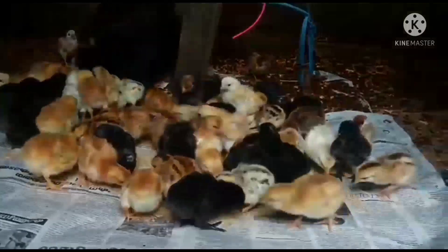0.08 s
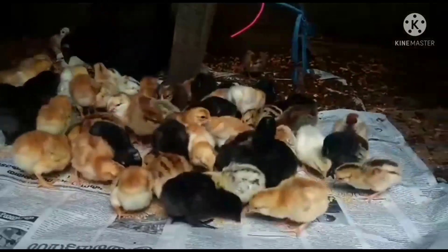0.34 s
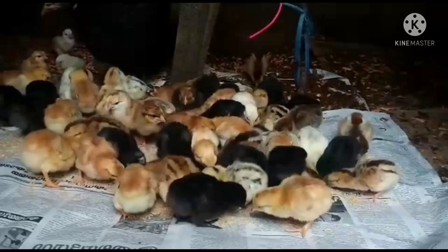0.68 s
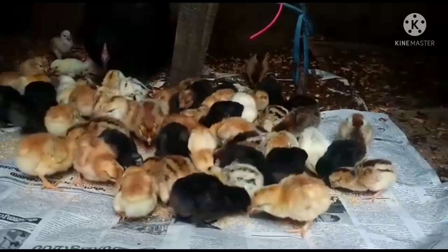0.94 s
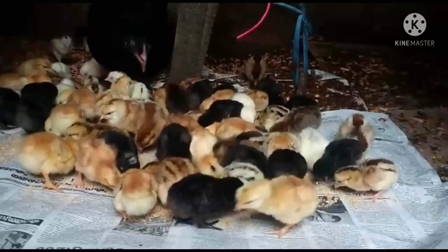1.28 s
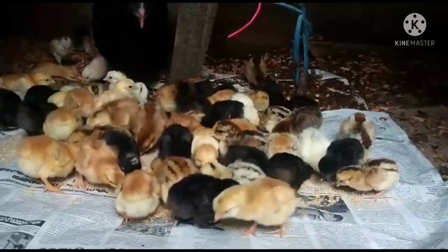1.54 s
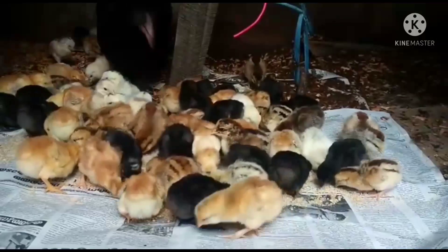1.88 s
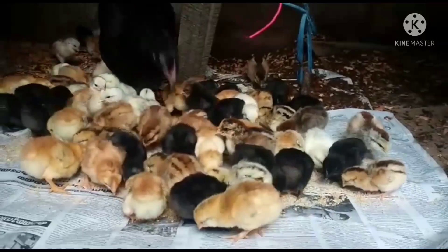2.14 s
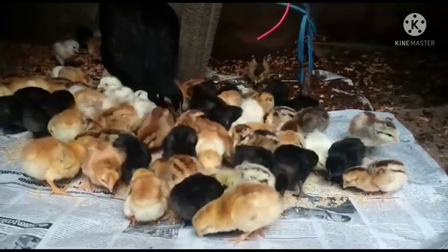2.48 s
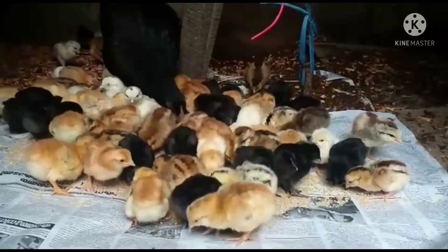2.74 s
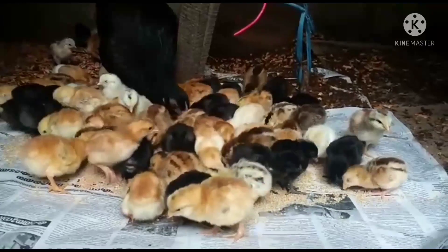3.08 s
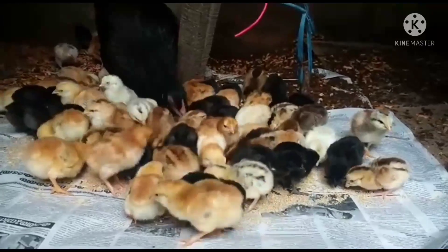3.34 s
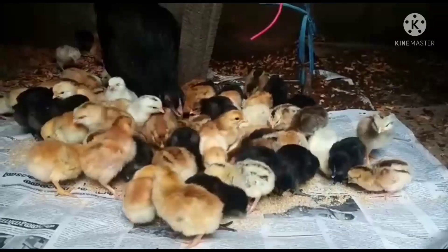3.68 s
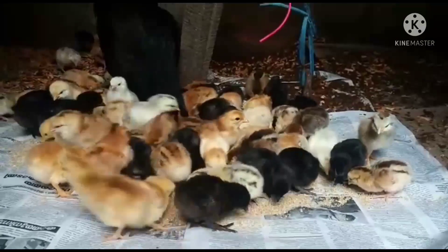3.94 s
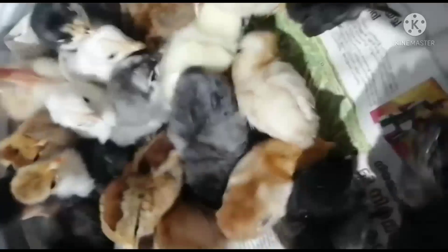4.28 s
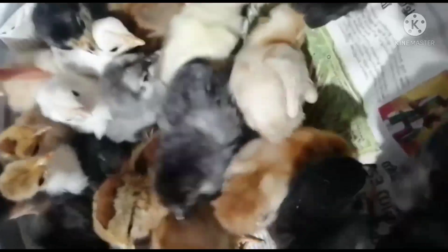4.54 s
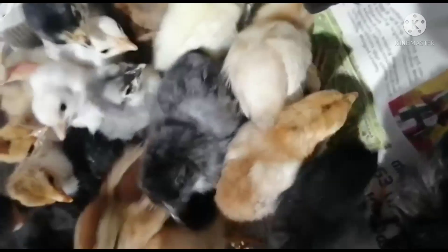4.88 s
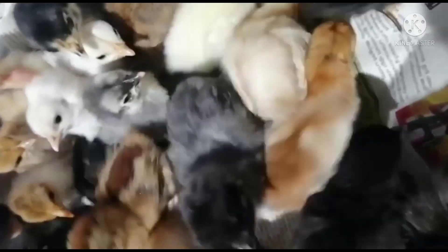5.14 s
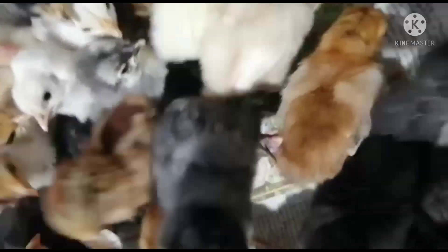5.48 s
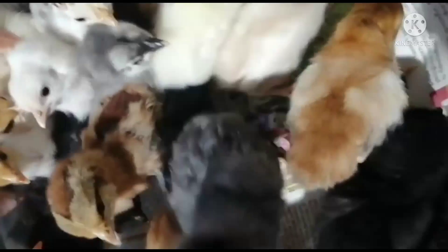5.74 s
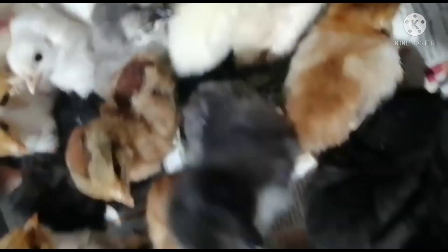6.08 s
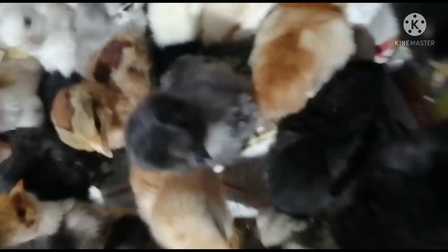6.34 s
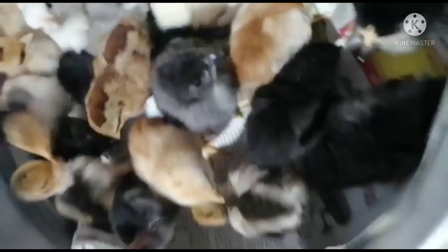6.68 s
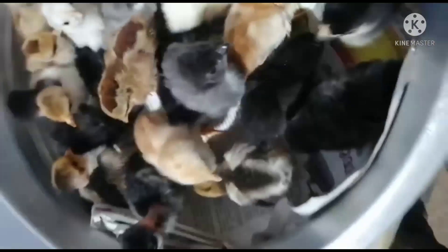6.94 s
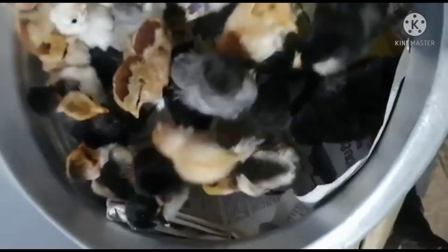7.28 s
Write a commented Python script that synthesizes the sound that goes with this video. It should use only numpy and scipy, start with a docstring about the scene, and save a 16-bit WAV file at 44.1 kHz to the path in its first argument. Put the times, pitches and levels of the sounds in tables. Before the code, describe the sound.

From the start, many chicks peep together on a shed floor, about a metre from the microphone. Quick rising twitters, short falling peeps and longer level whistles overlap, loudest around 2 seconds. Beneath them small feet shuffle and rustle on newspaper, with scattered dull pecks. At about 4.1 seconds everything drops to silence.

At 4.5 seconds the sound cuts in close to a metal tub. One chick gives seven loud, arching peeps, roughly every 0.4 seconds, each breaking to a lower, reedy tail; they grow louder and continue to about 7.3 seconds. A second chick answers from the left with four steep, falling cries between 4.7 and 6 seconds. Down brushes softly against the wall, with a few light taps and a tiny trill. A distant hen drawls very faintly from 5.6 to 6.6 seconds. A soft low bump comes near 6.4 seconds, followed by a few brief, hoarse squeaks.

```python
"""Chicks in a shed, then in a metal tub

A metre or so from a two-port microphone, a flock feeds on newspaper on a shed floor: rising twitters,
level whistles, peeps, pecks and scuffling feet. After a short silence two chicks cry close by in a metal
tub, one in arches that break to a low tail, the other in steep falls; down brushes the wall and a hen
drawls far off. Each chick call is a nearly pure syrinx tone, reaching each port with its own echoes."""
import sys
import numpy as np
from scipy import signal
from scipy.fft import rfft, irfft, next_fast_len
from scipy.io import wavfile
from scipy.ndimage import map_coordinates

SR = 44100
rng = np.random.default_rng(int(sys.argv[2]) if len(sys.argv) > 2 else 0)


def materialize(psi):
    """Save the field psi as 16-bit PCM at rate SR to the path in sys.argv[1].

    A 1-D psi becomes a single channel; in a 2-D psi each row is a channel.
    """
    bounded = np.clip(np.atleast_2d(psi).T, -1, 1)
    quanta = np.round(bounded * 32767).astype(np.int16)
    wavfile.write(sys.argv[1], SR, quanta)


N = 322812
FLOCK_END_S, TUB_START_S, TOP_HZ = 4.145, 4.551, 15600

# feet on the newspaper: t/s, relative shuffle level/dB, relative rustle level/dB
FOOT_ACTIVITY = [(0.0, -51, -60), (0.67, -50.5, -56.5), (0.88, -54.5, -63), (1.32, -55, -58.5),
                 (1.94, -52, -58.5), (2.37, -53, -56.5), (2.96, -52, -55.5), (3.48, -56.5, -58),
                 (3.79, -50, -58), (3.9, -57.5, -59)]
# spectra of low shuffle, fine rustle, shed air, tub air and down on metal: f/Hz, relative density/dB
SHUFFLE_SPECTRUM = [(25, -11.5), (70, -1.5), (130, 5.5), (200, -2), (450, -3), (900, -7.5), (1800, -4),
                    (3000, -4), (6000, -21.5)]
RUSTLE_SPECTRUM = [(500, -6.5), (2000, 4.5), (4000, 6.5), (7000, 1), (9000, -5.5), (12000, -5),
                   (15500, -16.5)]
SHED_AIR = [(15, -37), (25, -2), (113, -16.5), (368, -15), (567, -21.5), (970, -19), (2700, -21.5),
            (3630, -17.5), (4040, -21.5), (5430, -27), (7910, -17.5), (9300, -34.5), (12200, -41.5),
            (14300, -27.5), (15500, -26)]
TUB_AIR = [(15, -36.5), (25, -20), (107, -2.5), (169, -16), (399, -11.5), (598, -14.5), (919, -19),
           (1850, -12), (4260, -14), (5580, -13.5), (8580, -24.5), (9550, -26.5), (15500, -39.5)]
BRUSH_SPECTRUM = [(60, 0.5), (300, -14.5), (600, -8), (850, 3.5), (1200, -0.5), (1750, -5), (3000, -18),
                  (9000, -27)]
# downward slides and short peeps: t/s, length/s, nominal f/Hz, level/dB, left-right/dB
SLIDE_NOTES = [(0, 0.047, 1920, -49.5, -3), (.14, 0.087, 3300, -37, 4), (.32, 0.046, 3560, -32, 1),
               (.34, 0.031, 2490, -36, -5), (.482, 0.066, 3460, -27, -5), (.545, 0.031, 2750, -30.5, -11),
               (.655, 0.061, 3445, -34.5, 1), (.82, 0.13, 1880, -53, 0), (.905, 0.022, 2680, -45, 0),
               (1.06, 0.03, 3020, -33, -13), (1.1, 0.056, 1980, -58, -7), (1.155, 0.05, 1710, -53, -9),
               (1.22, 0.04, 2870, -50, -7), (1.435, 0.091, 1490, -44.5, -8), (2.44, 0.11, 2820, -46, 4),
               (2.65, 0.052, 2893, -40, 0), (3.32, 0.068, 2300, -46, 3), (3.44, 0.048, 2950, -51.5, 2),
               (3.785, 0.049, 3290, -46, -2), (3.82, 0.085, 1382, -38.5, -4.5),
               (3.998, 0.023, 3240, -38, -2), (3.985, 0.1, 1470, -43, -1), (4.78, 0.17, 2905, -60.5, -2),
               (5.668, 0.09, 3428, -47.5, 14), (5.78, 0.05, 2950, -41.5, -3),
               (6.745, 0.022, 3220, -43.5, 3), (6.978, 0.12, 2745, -47, 5), (7.06, 0.062, 1805, -50, 9)]
PEEP_NOTES = [(.88, 0.05, 3214, -33, 23), (1.295, 0.024, 2260, -36, -6), (1.2, 0.055, 3570, -30.5, -2),
              (1.64, 0.047, 1955, -36, -16), (1.95, 0.042, 3680, -22.5, 11), (2.647, .06, 2470, -40, -2),
              (2.775, .04, 4580, -34.5, -8), (3.825, 0.07, 2937, -38.5, -10), (3.93, 0.1, 3690, -33, -1),
              (3.94, 0.12, 1783, -42, -8)]
# upward feeding notes: t/s, length/s, start f/Hz, end f/Hz, level/dB
FEEDING_NOTES = [(0.019, 0.054, 2390, 3870, -39), (.085, 0.027, 3200, 4360, -41.5),
                 (0.199, 0.019, 3037, 5270, -36.5), (0.204, 0.023, 3690, 4480, -44),
                 (0.347, 0.034, 3400, 4720, -39), (0.415, 0.035, 3480, 4860, -39),
                 (0.461, 0.029, 3750, 4680, -39.5), (.61, 0.023, 3080, 4050, -40.5),
                 (0.826, 0.047, 3580, 4700, -37.5), (0.864, 0.023, 2600, 4840, -34),
                 (1.004, 0.021, 3190, 4710, -37), (1.11, .065, 4100, 4900, -38),
                 (1.146, 0.034, 2340, 4400, -42), (1.252, 0.05, 3500, 4980, -39.5),
                 (1.299, 0.045, 3110, 4770, -37), (1.465, 0.052, 3570, 5100, -36),
                 (1.628, 0.028, 3420, 4330, -49), (1.693, .025, 3680, 4700, -43.5),
                 (1.72, 0.026, 3380, 4660, -42.5), (1.776, 0.049, 2200, 3150, -49),
                 (1.797, .033, 3400, 4870, -40.5), (1.919, 0.055, 3700, 4900, -37),
                 (2.032, 0.02, 3750, 4600, -37.5), (2.147, 0.024, 3380, 5270, -36),
                 (2.166, 0.046, 3300, 4670, -29), (2.203, 0.025, 3480, 5300, -41.5),
                 (2.33, 0.02, 3700, 4800, -47.5), (2.406, 0.042, 3300, 4650, -35),
                 (2.559, 0.045, 3560, 4890, -36.5), (2.657, 0.03, 3450, 5000, -33),
                 (2.721, .04, 3370, 3970, -39), (2.767, 0.031, 3420, 4430, -38),
                 (2.818, 0.03, 2390, 4270, -37.5), (2.904, 0.047, 3456, 4500, -30.5),
                 (2.941, 0.048, 3680, 4840, -34), (3.107, 0.04, 3914, 4860, -29),
                 (3.162, 0.037, 3960, 4800, -37.5), (3.198, 0.028, 3290, 4130, -39),
                 (3.31, 0.018, 4170, 5050, -41), (3.364, .048, 3370, 4710, -35.5),
                 (3.381, 0.02, 3400, 3940, -40.5), (3.449, 0.025, 3500, 4600, -54.5),
                 (3.495, 0.036, 3000, 4740, -37), (3.511, 0.027, 3400, 5470, -50),
                 (3.663, 0.051, 3570, 4650, -40), (3.686, 0.03, 3360, 4510, -40.5),
                 (3.806, 0.04, 3260, 4360, -42), (3.839, 0.044, 3600, 4670, -32.5),
                 (3.882, 0.021, 3650, 4690, -32.5), (3.941, 0.042, 3620, 5150, -41.5),
                 (3.98, 0.026, 3900, 5070, -34), (4.08, 0.024, 2950, 3930, -43)]
# level whistles: t/s, length/s, crest f/Hz, level/dB, left-right/dB
WHISTLE_NOTES = [(0.083, 0.16, 1806, -41, -1.5), (0.218, 0.17, 2756, -37.5, -1),
                 (1.019, .23, 3102, -32, -12), (1.276, 0.17, 2370, -46, -7), (1.311, 0.22, 3183, -27, -10),
                 (1.36, 0.13, 2814, -48.5, 0), (1.588, 0.26, 3310, -27, 4.5), (1.89, 0.2, 3320, -27, 4),
                 (2.021, 0.061, 3604, -20.5, 8), (2.214, 0.18, 3582, -22, 1), (2.66, 0.17, 2845, -46, 0),
                 (2.865, 0.23, 2920, -42.5, 5), (3.063, .25, 1640, -45, -1), (3.422, 0.19, 1683, -44, -1.5),
                 (3.594, 0.14, 2602, -36, -6), (3.659, 0.2, 1736, -42, 2.5),
                 (4.085, 0.054, 4220, -36.5, -5)]
# pecks and footfalls, later taps in the tub: t/s, relative level/dB, resonance f/Hz, t60/s
PECKS_AND_STEPS = [(.18, -35.5, 433, 0.32), (0.45, -44, 390, 0.21), (0.774, -40, 790, 0.13),
                   (.901, -39.5, 248, 0.13), (1.683, -37, 500, 0.11), (2.001, -29.5, 1050, 0.14),
                   (2.247, -28, 236, .13), (2.479, -29, 447, 0.1), (2.48, -29.5, 1214, 0.13),
                   (2.649, -27, 2530, 0.025), (2.928, -37, 590, 0.23), (3.185, -37, 433, 0.24),
                   (3.605, -30, 1900, 0.22), (3.638, -30, 504, 0.13), (5.374, -22.5, 1350, 0.0093),
                   (5.678, -34.5, 1000, 0.023), (6.55, -40, 1004, 0.11), (6.575, -52, 367, 1)]
# hoarse protests: t/s, length/s, crest f/Hz, level/dB, left-right/dB
HOARSE_CRIES = [(.28, .06, 3830, -27, -4), (.428, .083, 3970, -26, 8), (6.652, .095, 4000, -40, 4),
                (7.055, .1, 4080, -39, 7)]
# first chick in the tub: t/s, climb/s, droop/s, crest f/Hz, break f/Hz, level/dB, left-right/dB,
# then its tail: length/s, f/Hz, relative level/dB, left-right/dB
ARCHED_CRIES = [(4.534, .043, 0.062, 4460, 3960, -27, 1.5, .055, 3210, -33, -2.5),
                (4.937, 0.049, 0.057, 4490, 3960, -25, 8, .06, 3350, -32, 8.5),
                (5.364, .056, 0.062, 4493, 3840, -27.5, 5, 0.067, 3170, -37, -1),
                (5.759, 0.054, 0.056, 4370, 3730, -25, -18, 0.055, 3176, -26, -20),
                (6.342, .035, 0.091, 4234, 3580, -22.5, -14, .043, 2900, -25, -0.5),
                (6.727, 0.044, 0.062, 4540, 4103, -22, 6, .058, 3400, -23, 14),
                (7.115, .05, 0.049, 4556, 4220, -21, 3, 0.078, 3350, -24.5, -16)]
# second chick: t/s, length/s, held f/Hz, nominal break f/Hz, level/dB, relative tail/dB, left-right/dB
FALLING_CRIES = [(4.685, .057, 4830, 4320, -30.5, -39.5, 18), (5.042, 0.06, 4914, 4270, -29.5, -44.5, 35.5),
                 (5.46, 0.054, 5300, 4350, -28.5, -37.5, 28), (5.967, .049, 5315, 4560, -29, -31, 18)]
# bodies against the tub wall: mid-stroke t/s, relative level/dB
BRUSH_STROKES = [(4.95, -67.5), (5.311, -63.5), (5.7, -59.5), (5.86, -63.5), (6.32, -58.5), (6.589, -57.5),
                 (6.72, -66)]
# soft purling: t/s, length/s, centre f/Hz, swing/Hz, swing rate/Hz, level/dB
TRILL_NOTES = [(5.261, 0.078, 3564, 917, 32, -41.5)]
# the far hen's drawl: t/s, f/Hz, level/dB
HEN_DRAWL = [(5.62, 356, -81), (5.78, 353, -61.5), (6, 348.5, -69.5), (6.2, 336.6, -66),
             (6.35, 330.4, -56.5), (6.5, 321, -66), (6.6, 315, -74)]
# colour of a chick's throat, the hen's throat and the reflections: f/Hz, gain/dB
CHICK_THROAT = [(1200, -6.5), (3000, 9), (5500, 4.5), (6700, -6.5), (7500, -2.5), (9000, -8), (11000, -14),
                (13300, -11), (15500, -18.5)]
HEN_FORMANTS = [(340, -38), (680, 6.5), (1000, 4), (1350, -11), (1720, 6.5), (2050, -2), (2800, -33)]
REFLECTION_COLOUR = [(300, 2.5), (4400, 7.5), (7000, 10.5), (10000, 5), (15000, 8)]
# likeness of noise at the two ports: f/Hz, correlation
PORT_LIKENESS = [(100, 0.91), (300, 0.76), (600, 0.58), (1200, 0), (15000, 0)]
# balance of the ports over the tub: f/Hz, left-right/dB
TUB_BALANCE = [(2000, 4), (3000, -6), (4400, 3.5), (5500, -2.5), (7500, 6), (10000, 8.5), (13000, -0.5)]


def amp(db):
    return 10 ** (np.asarray(db) / 20)


def unit(x):
    return x / np.sqrt(np.mean(x ** 2) + 1e-20)


def along(points, hz):
    """Read (frequency, value) points on a log axis."""
    f, values = np.transpose(points)
    return np.interp(np.log(hz + 1), np.log(f), values)


def curves(rows):
    """One value per sample for each column after the time."""
    s, *columns = np.transpose(rows)
    return [np.interp(np.arange(N) / SR, s, column) for column in columns]


def clock(length_s):
    return np.arange(max(int(length_s * SR), 64)) / SR


def wobble(rate, n):
    """A smooth random curve of n samples, rate knots a second."""
    return map_coordinates(rng.standard_normal(int(n * rate / SR) + 4), [np.arange(n) * rate / SR])


def filtered(x, response):
    """Shape x by a response given as a function of frequency."""
    n = x.shape[-1]
    padded = next_fast_len(n + 4096)
    return irfft(rfft(x, padded) * response(np.fft.rfftfreq(padded, 1 / SR)), padded)[..., :n]


def add(track, s, x):
    """Mix a stereo sound in at s seconds."""
    i = int(np.clip(round(s * SR), 0, N - 1))
    track[:, i:i + x.shape[1]] += x[:, :N - i]


def noise(spectrum):
    """Noise of rms 1, alike at both ports in the bass and unrelated in the treble."""
    def mid_side_gains(hz):
        angle = np.arccos(np.clip(along(PORT_LIKENESS, hz), -1, 1)) / 2
        return amp(along(spectrum, hz)) * [np.cos(angle), np.sin(angle)]
    mid, side = filtered(rng.standard_normal((2, N)), mid_side_gains)
    return unit(np.array([mid + side, mid - side]))


def place(x, pan_db, lead_s, early_db, early_t60, late_db, late_t60):
    """Direct sound, the left port ahead by lead_s, then reflections and a room tail new for each spot."""
    t = clock(.45)

    def echoes(t60):
        return unit(rng.standard_normal((2, len(t))) * amp(-60 * t / t60) * (t > .002)) / np.sqrt(len(t))
    room = amp(early_db) * echoes(early_t60) + amp(late_db) * echoes(late_t60)
    response = filtered(room, lambda hz: amp(along(REFLECTION_COLOUR, hz)))
    delay = np.clip(np.round([-lead_s * SR, lead_s * SR]), 0, len(t) - 1).astype(int)
    response[[0, 1], delay] += unit(amp([pan_db / 2, -pan_db / 2]))
    return signal.fftconvolve(x[None], response, axes=1)


def in_shed(x, pan_db, lead_s, wet_db=0):
    """On the shed floor, a metre or so from the microphone."""
    return place(x, pan_db, lead_s, early_db=wet_db - 10.5, early_t60=.087,
                 late_db=wet_db - 16, late_t60=.15)


def in_tub(x, pan_db):
    """Down among the metal walls."""
    return place(x, pan_db, lead_s=.0003, early_db=-2.5, early_t60=.17, late_db=-12, late_t60=.42)


def on_mic(x, pan_db):
    """From a raised beak aimed at the ports: mostly direct sound."""
    return place(x, pan_db, lead_s=.0003, early_db=-16.5, early_t60=.08, late_db=-21, late_t60=.42)


def among_chicks(s, x, db, pan_db):
    """Places a call in the shed or the tub, by its time."""
    if s < FLOCK_END_S:
        faintness_db = np.clip(-20.5 - db, -5, 10)
        return in_shed(amp(db) * x, pan_db, lead_s=.0004, wet_db=.01 * faintness_db)
    return in_tub(amp(db) * x, pan_db)


def glide(t, start, middle, end):
    """A parabolic pitch path through three points."""
    return np.polyval(np.polyfit([0, .5, 1], [start, middle, end], 2), t / t[-1])


def arch(t, crest_s, start, end, flatness):
    """A pitch path as a share of its crest: up from the start, a flat top, down to the end."""
    u = (t - crest_s) / np.where(t < crest_s, crest_s, t[-1] - crest_s)
    return 1 - (1 - np.where(u < 0, start, end)) * np.abs(u) ** flatness


def swell(t, rise, fall):
    """Air pressure over a note: smooth rise and fall, as shares of its length."""
    u = t / t[-1]
    return np.sin(np.pi / 2 * np.minimum(u / rise, 1)) * np.sin(np.pi / 2 * np.minimum((1 - u) / fall, 1))


def syrinx(pitch, overtone_db, slope_db, jitter=.0027, flutter_db=3.5):
    """A chick's voice: a slightly unsteady tone with overtones coloured by the throat."""
    n = len(pitch)
    phase = 2 * np.pi * np.cumsum(pitch * (1 + jitter * wobble(221.6, n))) / SR
    tone = np.sin(phase)
    for k in range(2, 6):
        gain = amp(overtone_db + slope_db * (k - 2) + along(CHICK_THROAT, k * pitch))
        tone += gain * (k * pitch < TOP_HZ) * np.sin(k * phase)
    return np.sqrt(2) * tone * amp(flutter_db * wobble(74.8, n))


def scuffle(count=170):
    """Many small feet on newspaper: a low shuffle, a fine rustle and single ticks that grow busier."""
    shuffle_db, rustle_db = curves(FOOT_ACTIVITY)
    taps = np.zeros(N)
    tap_samples = (rng.random(count) ** .6 * FLOCK_END_S * SR).astype(int)
    np.add.at(taps, tap_samples, amp(4.5 * rng.exponential(size=count).clip(0, 2)))
    ticks = amp(-10) * unit(signal.lfilter([1], [1, -np.exp(-1 / (.0041 * SR))], taps))
    rustle = noise(RUSTLE_SPECTRUM) * amp(rustle_db + 7.5) * (amp(4 * wobble(25, N)) + ticks)
    shuffle = noise(SHUFFLE_SPECTRUM) * amp(shuffle_db + 2.5) * (amp(3.1 * wobble(18, N)) + ticks)
    return rustle + shuffle


def peeps(rows, start, end, jitter):
    """Short, rough calls falling from start to end (shares of nominal pitch); reedier in the tub."""
    out = np.zeros((2, N))
    for s, length, hz, db, pan_db in rows:
        t = clock(length)
        overtone_db = -25 if s < FLOCK_END_S else -9
        voice = syrinx(hz * glide(t, start, .94, end), overtone_db, -4, jitter, flutter_db=1.5)
        add(out, s, among_chicks(s, voice * swell(t, rise=.23, fall=.85), db, pan_db))
    return out


def huddle(count=280, rising_share=.62):
    """The chicks at the back of the shed: faint flicks and lower, falling chatter at random."""
    out = np.zeros((2, N))
    for i, (when, kind) in enumerate(rng.random((count, 2))):
        size, height, loudness, side = rng.standard_normal(4)
        db = -48 + 2.5 * min(loudness, 1.3) - 1.53 * abs(height)
        if kind < rising_share:
            t = clock(.035 * np.exp(.25 * size))
            pitch = glide(t, 3148, 3700, 4650) * np.exp(.12 * height)
        else:
            t = clock(.055 * np.exp(.25 * size))
            pitch = glide(t, 2800, 2700, 2276) * np.exp(.26 * min(height, 1.8))
            db -= 2.5
        note = syrinx(pitch, overtone_db=-29, slope_db=-16, jitter=.012) * swell(t, rise=.81, fall=.67)
        distant = place(amp(db) * note, pan_db=3 * side, lead_s=.00032 * side,
                        early_db=-2.5, early_t60=.13, late_db=-10.5, late_t60=.22)
        add(out, (i + when) / count * FLOCK_END_S, distant)
    return out


def twitters(dwell_s=.04, sag_hz_per_s=9000):
    """Contented upward flicks from all over the flock; a longer one dwells and sags before it rises."""
    out = np.zeros((2, N))
    for s, length, start_hz, end_hz, db in FEEDING_NOTES:
        t = clock(length)
        u = t / t[-1]
        climb = u ** (1 + (length / dwell_s) ** 2)
        pitch = start_hz + (end_hz - start_hz) * climb - sag_hz_per_s * t * (1 - u)
        voice = syrinx(pitch, overtone_db=-22.5, slope_db=0, jitter=.012, flutter_db=2.5)
        note = amp(db) * voice * swell(t, rise=.4, fall=.24)
        add(out, s, in_shed(note, rng.normal(0, 3.4), lead_s=rng.normal(.00029, .0001), wet_db=-.5))
    return out


def whistles():
    """Drawn-out, firm peeps that ease up to one pitch, hold it and swell in the middle."""
    out = np.zeros((2, N))
    for s, length, hz, db, pan_db in WHISTLE_NOTES:
        t = clock(length)
        pitch = hz * arch(t, .55 * length, start=.91, end=.93, flatness=3)
        voice = syrinx(pitch, overtone_db=-27, slope_db=-5, jitter=.006, flutter_db=1)
        add(out, s, among_chicks(s, voice * swell(t, rise=.44, fall=.39), db, pan_db))
    return out


def pecks_and_steps():
    """Pecks and steps on the shed's paper, later taps in the tub: dull knocks with a short crackle."""
    out, t = np.zeros((2, N)), clock(.3)
    for s, db, knock_hz, t60 in PECKS_AND_STEPS:
        def dull_resonance(hz):
            resonance = 1j * hz * knock_hz / (knock_hz ** 2 - hz ** 2 + .9j * hz * knock_hz)
            return resonance / (1 + 1j * hz / 3000)
        body = unit(filtered(rng.standard_normal(len(t)), dull_resonance)) * amp(-60 * t / t60)
        crackle = amp(-16) * rng.standard_normal(len(t)) * amp(-60 * t / .026)
        add(out, s, in_shed(amp(db - 4) * (body + crackle), pan_db=6.3, lead_s=.00019))
    return out


def hoarse_cries(rasp=.04):
    """Jostled chicks protest: a full, hoarse arch whose pitch shakes fast."""
    out = np.zeros((2, N))
    for s, length, hz, db, pan_db in HOARSE_CRIES:
        t = clock(length)
        pitch = hz * arch(t, .4 * length, start=.88, end=.92, flatness=2.5)
        pitch *= 1 + rasp * wobble(1100, len(t))
        note = syrinx(pitch, overtone_db=-25, slope_db=-3, flutter_db=3) * swell(t, rise=.2, fall=.15)
        add(out, s, among_chicks(s, note, db, pan_db))
    return out


def broken_tail(length_s, hz, overtone_db, slope_db, end, drop):
    """As pressure fails the voice drops to a lower, reedier register, holds briefly and bends away."""
    t = clock(length_s)
    pitch = hz * (glide(t, 1, (2 + end) / 3, end) + drop * np.exp(-t / .0025))
    voice = syrinx(pitch, overtone_db, slope_db, jitter=.003, flutter_db=1.5)
    return voice * swell(t, rise=.04, fall=.95) ** 1.25


def arched_cries():
    """A lost chick's loud, smooth peep, on mic: up to a crest, down to the break, then the tail."""
    out = np.zeros((2, N))
    for s, climb, droop, crest_hz, break_hz, db, pan_db, *tail_row in ARCHED_CRIES:
        tail_s, tail_hz, tail_db, tail_pan_db = tail_row
        t = clock(climb + droop)
        pitch = crest_hz * arch(t, climb, start=.83, end=break_hz / crest_hz, flatness=2.1)
        voice = syrinx(pitch, overtone_db=-15, slope_db=-6, jitter=.0015, flutter_db=-1.5)
        tail = broken_tail(tail_s, tail_hz, overtone_db=-6.5, slope_db=-5.5, end=.63, drop=.21)
        add(out, s, on_mic(amp(db) * voice * swell(t, rise=.44, fall=.04), pan_db))
        add(out, s + climb + droop - .002, on_mic(amp(tail_db - .5) * tail, tail_pan_db))
    return out


def falling_cries(onset_s=.011, onset_hz=6150, scoop_hz=450, sink_hz=200, settle_s=.005):
    """A second chick answers from the top of its range: thin onset, full sinking voice, reedy tail."""
    out = np.zeros((2, N))
    for s, length, held_hz, break_hz, db, tail_db, pan_db in FALLING_CRIES:
        onset_t, t = clock(onset_s), clock(length)
        onset_pitch = np.linspace(onset_hz, held_hz + scoop_hz, len(onset_t))
        onset = syrinx(onset_pitch, overtone_db=-9, slope_db=-10) * swell(onset_t, rise=.91, fall=.09)
        pitch = np.linspace(held_hz, break_hz, len(t))
        pitch += scoop_hz * np.exp(-t / settle_s)  # settles from above
        pitch -= sink_hz * np.exp((t - length) / settle_s)  # sinks just before the break
        voice = syrinx(pitch, overtone_db=-12.5, slope_db=-9, jitter=.0015, flutter_db=1.5)
        tail = broken_tail(length_s=.035, hz=3787, overtone_db=.5, slope_db=1.5, end=.68, drop=0)
        add(out, s - onset_s, in_tub(amp(db - 10.5) * onset, pan_db))
        add(out, s, in_tub(amp(db) * voice * swell(t, rise=.18, fall=.078), pan_db))
        add(out, s + length, in_tub(amp(tail_db - 2) * tail, pan_db))
    return out


def brushing(half_stroke_s=.066):
    """Down brushes the metal in strokes that swell and fade, with faint stirring between them."""
    t = np.arange(N) / SR
    strokes = sum(amp(db) * np.exp(-((t - s) / half_stroke_s) ** 2) for s, db in BRUSH_STROKES)
    catching = amp(2.5 * wobble(40, N))
    return amp(4.5) * (strokes + amp(-72)) * catching * noise(BRUSH_SPECTRUM)


def trill():
    """Another chick in the tub purls softly on mic, its pitch swinging fast."""
    out = np.zeros((2, N))
    for s, length, centre_hz, swing_hz, rate_hz, db in TRILL_NOTES:
        t = clock(length)
        pitch = centre_hz + swing_hz * np.cos(2 * np.pi * rate_hz * t)
        note = syrinx(pitch, overtone_db=-5, slope_db=-7) * swell(t, rise=.48, fall=.19)
        add(out, s, on_mic(amp(db) * note, pan_db=3.2))
    return out


def far_hen():
    """A hen outside, well off mic, draws out one faint, hoarse, sinking note."""
    pitch, db = curves(HEN_DRAWL)
    phase = 2 * np.pi * np.cumsum(pitch * (1 + .0128 * wobble(90, N))) / SR
    harmonics = (amp(along(HEN_FORMANTS, k * np.median(pitch))) * np.sin(k * phase) for k in range(1, 8))
    voice = amp(db) * unit(sum(harmonics))
    return place(voice, pan_db=0, lead_s=0, early_db=-12, early_t60=.06, late_db=-10, late_t60=.3)[:, :N]


def handling_bump(at_s=6.357, hz=36, db=-32, t60=.13):
    """One soft, low handling bump, the same at both ports."""
    out, t = np.zeros((2, N)), clock(.2)
    bump = amp(db) * np.sin(2 * np.pi * hz * t) * amp(-60 * t / t60)
    add(out, at_s, np.array([bump, bump]))
    return out


def squawk(at_s=6.844, length_s=.043, nominal_hz=5830, db=-32.5):
    """A jostled chick in the tub forces its voice into a rasping downward slide."""
    out, t = np.zeros((2, N)), clock(length_s)
    pitch = nominal_hz * glide(t, 1.22, .88, .85) * (1 + .035 * wobble(900, len(t)))
    note = syrinx(pitch, overtone_db=-20, slope_db=7, flutter_db=-1) * swell(t, rise=.18, fall=.23)
    add(out, at_s, in_tub(amp(db) * note, pan_db=0))
    return out


def scene():
    """The shed, a silent gap, then the tub, whose wall throws the cries' upper treble to the left port."""
    t = np.arange(N) / SR
    both_places = peeps(PEEP_NOTES, start=1, end=.79, jitter=.016)
    both_places += peeps(SLIDE_NOTES, start=1.08, end=.87, jitter=.017)
    both_places += whistles() + hoarse_cries() + pecks_and_steps()
    shed = both_places + twitters() + huddle() + scuffle() + amp(-72.5) * noise(SHED_AIR)
    cries = arched_cries() + falling_cries() + squawk()
    cries = filtered(cries, lambda hz: amp(np.outer([.5, -.5], along(TUB_BALANCE, hz))))
    tub = both_places + cries + trill() + far_hen() + brushing() + handling_bump()
    tub += amp(-59.5) * noise(TUB_AIR)
    fade_out = np.clip((FLOCK_END_S - t) / .065, 0, 1)
    cut_in = np.clip((t - TUB_START_S) / .00034, 0, 1)
    return shed * fade_out + tub * cut_in


def record(dry):
    """The recorder keeps nothing above its band limit."""
    return filtered(dry, lambda hz: hz < TOP_HZ)


dry = scene()
out = record(dry)
materialize(out)
```